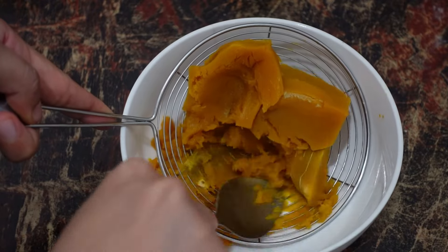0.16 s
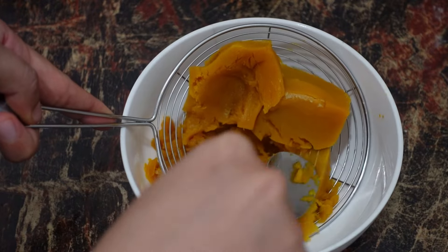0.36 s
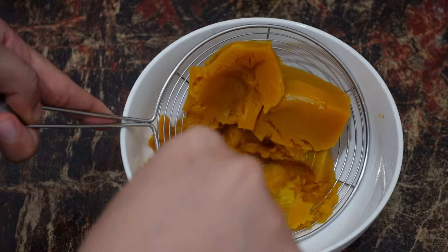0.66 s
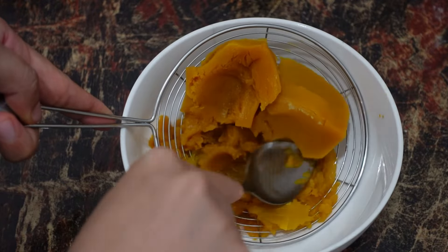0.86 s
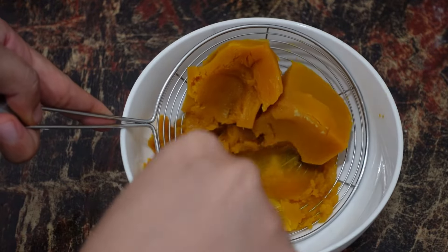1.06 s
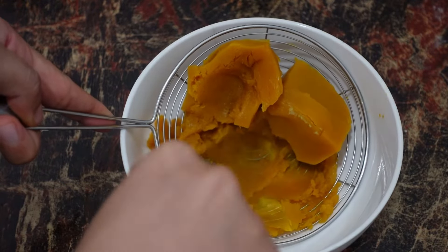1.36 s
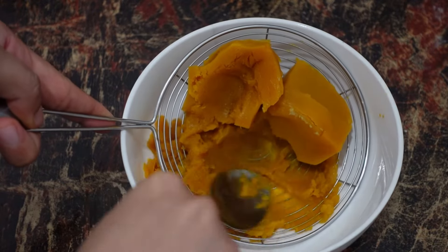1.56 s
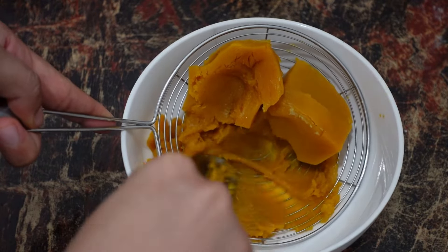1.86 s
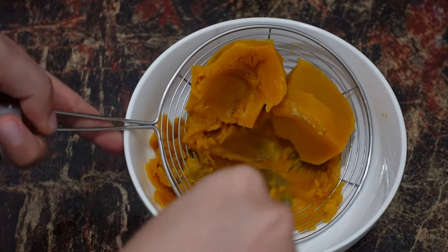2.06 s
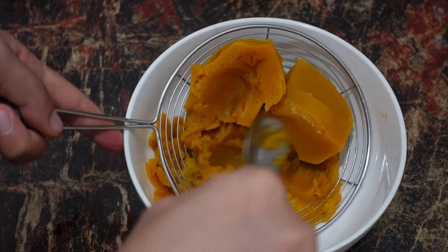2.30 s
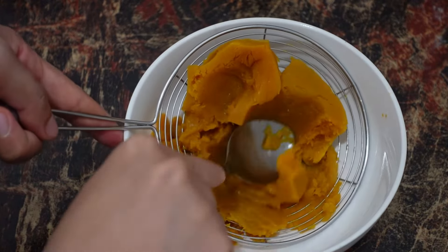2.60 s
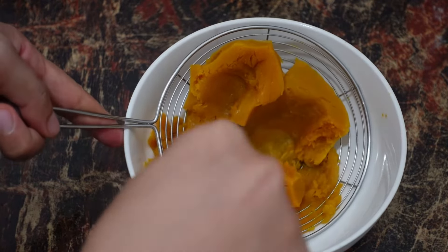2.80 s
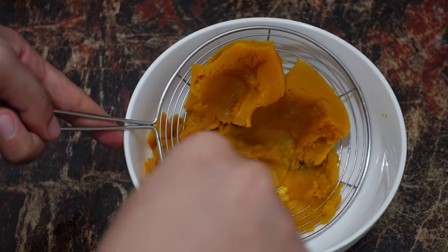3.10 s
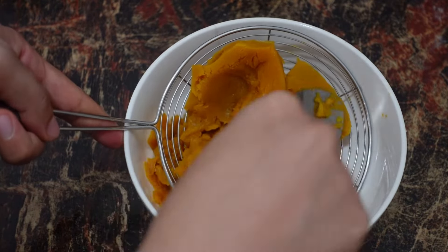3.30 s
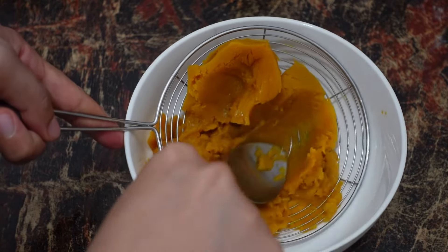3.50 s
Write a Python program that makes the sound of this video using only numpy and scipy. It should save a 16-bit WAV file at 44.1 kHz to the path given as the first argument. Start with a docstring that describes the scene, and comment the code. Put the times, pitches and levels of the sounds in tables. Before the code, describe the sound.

Cooked pumpkin squelches quietly under a steel spoon, with irregular wet pops, crackles and tiny squeaks for the first 1.5 seconds. Then the wire strainer clinks sharply against a china bowl, with a short scrape, and knocks again at about 1.8 and 2.1 seconds. Softer squishing continues, with light taps near 2.6 seconds and small taps and scrapes around 3.4 to 3.5. It is close, in a kitchen, over faint hiss.

```python
"""A live kitchen, where a steel spoon mashes cooked pumpkin through a wire strainer in a china bowl.
The wet pulp squelches, squeaks and crackles, and its air pockets pop. The spoon scrapes and skids over
the wires and knocks the strainer against the bowl three times, then taps more lightly; each contact
rings steel and china. All is heard close and in stereo, over a faint steady hiss."""
import sys
import numpy as np
from scipy import signal
from scipy.fft import rfft, irfft
from scipy.io import wavfile
from scipy.ndimage import uniform_filter1d

SR = 44100
rng = np.random.default_rng(int(sys.argv[2]) if len(sys.argv) > 2 else 0)


def to_wav(s):
    """Save 16-bit WAV."""
    ch = np.atleast_2d(s).T  # columns
    pcm = np.round(np.clip(ch, -1, 1) * 32767)  # PCM
    wavfile.write(sys.argv[1], SR, pcm.astype(np.int16))


N = 160965

# Contacts of spoon, strainer and bowl:
# (time [s], bowl level [dB], spoon level [dB], wire level [dB], brightness [dB/octave])
CONTACTS = [(1.5508, -33.5, -36, -34, 8.5), (1.5524, -27, -30.5, -27.5, 1.5), (1.556, -35, -35.5, -33, 5),
            (1.589, -40, -41, -44.5, 5), (1.623, -44.5, -45, -52.5, -1), (1.8349, -47, -37.5, -37.5, 5.5),
            (1.844, -38, -45, -35, 7), (1.8503, -37.5, -48.5, -34, 4), (1.8598, -36.5, -37.5, -31.5, 0),
            (2.124, -46.5, -60, -39, 2.5), (2.1298, -43.5, -44.5, -32.5, 3), (2.1332, -36, -45, -31, -0.5),
            (2.1421, -44.5, -55, -40.5, -4), (2.144, -45.5, -47.5, -38.5, -5.5),
            (2.149, -43.5, -52.5, -37.5, -2.5), (2.563, -49.5, -41.5, -43.5, 1),
            (2.6297, -55, -44.5, -46, 2), (3.3662, -55.5, -46, -50, 3), (3.3885, -47.5, -48, -47, 4),
            (3.42, -48.5, -57, -49.5, 10), (3.4989, -48.5, -42, -48, 3), (3.5187, -46, -42.5, -45, 1.5),
            (3.541, -53, -62, -45.5, 2)]
# Resonances of the steel spoon: (frequency [Hz], level [dB], T60 [s])
SPOON_MODES = [(1600, 1.5, 0.016), (2016, 5, 0.00784), (2725, -5, 0.0143), (3535, -5.5, 0.0376),
               (4600, -9.5, 0.021), (5409, -7, 0.0285), (5984, -11.5, 0.0103), (7290, -9.5, 0.0124),
               (9320, -8.5, 0.0158), (10936, -12.5, 0.0061)]


def from_db(db):
    """Decibels to gain."""
    return 10 ** (np.asarray(db) / 20)


def seconds(length):
    """A time axis."""
    return np.arange(int(length * SR)) / SR


def rms_one(x):
    """Scale to rms 1."""
    return x / np.sqrt(np.mean(x ** 2) + 1e-20)


def hit_one(x):
    """Scale a hit to rms 1 over its first 6 ms."""
    return x / np.sqrt(np.mean(x[..., :int(.006 * SR)] ** 2) + 1e-20)


def dying(t, t60):
    """Exponential decay, 60 dB down at t60."""
    return np.exp(-np.log(1000) * t / t60)


def stroke(t, length, attack_s, fall_db):
    """Quick rise, a sag over the length, then a release half as long."""
    attack = np.minimum(t / attack_s, 1)
    release = np.clip(1 - 2 * (t / length - 1), 0, 1)
    return attack * from_db(-fall_db * t / length) * release


def at_hz(points, hz):
    """Read a table on a log-frequency axis."""
    f, value = np.transpose(points)
    return np.interp(np.log(np.maximum(hz, 1)), np.log(f), value)


def panned(x, pan_db):
    """Place a sound left (+) or right (-)."""
    return x * from_db(np.array([[.5], [-.5]]) * pan_db)


def add(out, s, x):
    """Mix x in at time s."""
    i = int(s * SR)
    out[..., i:i + x.shape[-1]] += x[..., :max(N - i, 0)]


def softened(x, low_hz, high_hz):
    """Roll off bass and treble."""
    band = signal.butter(2, [low_hz, min(high_hz, .45 * SR)], "band", fs=SR, output="sos")
    return signal.sosfilt(band, x)


def coloured(x, spectrum, tilt_db=0):
    """Give a noise a spectrum, tilted per octave, at rms 1."""
    hz = np.fft.rfftfreq(x.shape[-1], 1 / SR)
    gain = from_db(at_hz(spectrum, hz) + tilt_db * np.log2(hz + 1))
    return rms_one(irfft(rfft(x) * gain, x.shape[-1]))


def echoed(x, response):
    """Pass a stereo sound through a response scaled to unit energy per side."""
    return signal.fftconvolve(x, response / np.sqrt((response ** 2).sum() / 2), axes=1)[:, :N]


def stereo_noise(n):
    """White noise, centred in the deep bass and wider above."""
    # Stereo image: (frequency [Hz], left-right correlation [0-1])
    likeness = [(40, 0.93), (130, 0.922), (260, 0.168), (550, 0.4), (1100, 0.521), (2500, 0.634),
                (5000, 0.733), (9000, 0.527), (14000, 0.076)]
    alike = at_hz(likeness, np.fft.rfftfreq(n, 1 / SR))
    mid, side = rfft(rng.standard_normal((2, n)))
    return rms_one(irfft(np.sqrt(1 + alike) * mid + np.sqrt(1 - alike) * side * [[1], [-1]], n))


def jitter(shape):
    """Fast random wavering: noise smoothed over 2 ms."""
    return rms_one(uniform_filter1d(rng.standard_normal(shape), size=90))


def grains(n, per_s, spread_db=2.5):
    """Random clicks of uneven size."""
    chance, size, sign = rng.random((3, n))
    gain = from_db(spread_db * np.minimum(-np.log(1 - size), 4))
    return (chance < per_s / SR) * gain * np.sign(sign - .5)


def cavity(x, hz, cycles):
    """A damped resonance that rings for a few cycles."""
    q = max(cycles * np.pi / np.log(1000), 1)
    return signal.lfilter(*signal.iirpeak(min(hz, .42 * SR), q, fs=SR), x)


def struck(modes, detune=0.0098, tilt_db=0):
    """One blow on a body: each mode rings with its own strength, detuned a little by pulp and grip."""
    hz, db, t60 = np.transpose(modes)[:, :, None]
    t = seconds(.5)
    spread_db = 2.5 * rng.standard_normal(hz.shape)
    gain = from_db(db + tilt_db * np.log2(hz) + spread_db) * rng.choice([-1, 1], hz.shape)
    hz = hz * (1 + detune * rng.standard_normal(hz.shape))
    rings = gain * np.cos(2 * np.pi * hz * t) * dying(t, t60)
    return hit_one(rings.sum(0))


def squelches():
    """Swarms of tiny resonant clicks make a wet fizz that starts quickly and fades."""
    # Short wet fizzes, soft pops and fading hissy tails: (time [s], length [s], level [dB], centre [Hz])
    fizzes = [(0.166, 0.1286, -46, 2050), (0.177, 0.13, -44.5, 4380), (0.347, 0.114, -53, 6900),
              (0.483, 0.0116, -36.5, 6720), (0.496, 0.063, -42, 6880), (0.565, 0.152, -45.5, 5200),
              (0.647, 0.0101, -37, 4450), (0.754, 0.1614, -50, 6510), (0.934, 0.0823, -50, 1635),
              (1.013, 0.039, -52, 2050), (1.103, 0.1153, -51.5, 2330), (1.104, .03, -45.5, 7470),
              (1.318, 0.0554, -46, 2280), (1.36, 0.08, -51.5, 9697), (1.418, 0.0434, -51, 2400),
              (1.785, .04, -47.5, 8940), (1.984, .025, -46.5, 1796), (2.325, 0.055, -54.5, 8324),
              (2.628, 0.01916, -49, 1744), (2.466, 0.083, -48.5, 9420), (2.639, 0.0687, -52, 4304),
              (2.664, 0.021, -39.5, 3920), (2.724, 0.114, -58, 4840), (2.969, 0.0116, -38, 5280),
              (2.981, 0.084, -56, 5520), (3.01, .011, -39.5, 5130), (3.091, 0.218, -55, 4730)]
    out = np.zeros(N)
    for s, length, db, hz in fizzes:
        t = seconds(1.5 * length)
        swarm = cavity(grains(len(t), per_s=3500), hz, cycles=4.02)
        swarm = softened(swarm, low_hz=1032, high_hz=2.34 * hz)
        add(out, s, from_db(db) * rms_one(swarm) * stroke(t, length, attack_s=0.0017, fall_db=15))
    return out


def pops():
    """A film of pulp tears; the pocket behind it rings briefly, with a weaker, lower resonance."""
    # Air pockets in the pulp: (time [s], level [dB], pitch [Hz], pan [dB])
    pockets = [(0.02, -44, 6252, 0), (0.3337, -37.5, 5400, 0.5), (0.3636, -49.5, 1365, -5.5),
               (0.406, -45.5, 5945, 2), (0.5027, -46, 1680, -3), (0.7472, -42.5, 7297, 4),
               (0.836, -39.5, 11460, 2.5), (0.917, -47, 4530, -2), (0.9215, -34.5, 3520, -1),
               (0.9418, -44, 3322, 1.5), (0.9463, -35, 3905, -3.5), (1.0155, -45.5, 2214, 0),
               (1.102, -38.5, 6780, 2), (1.2662, -40, 10400, -0.5), (1.272, -30, 4070, -1),
               (1.313, -40, 6340, -3), (1.753, -42, 5130, 0), (1.777, -40.5, 9000, 2),
               (1.932, -49, 8500, -1.5), (2.1912, -49, 7600, -4), (2.26, -44, 5300, -2),
               (2.4611, -38.5, 10660, 3.5), (2.6324, -38, 2890, -0.5), (2.659, -47, 7200, -3.5),
               (2.77, -49, 4170, -3.5), (3.216, -42.5, 7960, 2), (3.266, -46, 1823, 1.5),
               (3.471, -48.5, 6950, -3.5), (3.5988, -47.5, 9000, -0.5)]
    out, t = np.zeros((2, N)), seconds(.02)
    for s, db, hz, pan_db in pockets:
        tear = stereo_noise(len(t)) * np.exp(-t / 0.001154)
        ring = hit_one(cavity(tear, hz, cycles=6.06))
        body = hit_one(cavity(tear, 0.574 * hz, cycles=2.1))
        pop = softened(ring + from_db(-11.5) * body, low_hz=784, high_hz=2.127 * hz)
        add(out, s, panned(from_db(db) * hit_one(pop), pan_db))
    return out


def squeaks():
    """Wet pulp squeaks under the spoon in short, unsteady glides."""
    # Wet squeaks: (time [s], length [s], level [dB], start pitch [Hz], end pitch [Hz], roughness [0-1])
    glides = [(0.167, 0.016, -40.5, 2257, 2686, 0.78), (.547, 0.01072, -39, 2941, 3362, 0.58),
              (0.57, 0.046, -43, 2463, 2440, 0.21), (1.342, 0.0114, -45.5, 2663, 2848, 0.42),
              (2.024, .035, -48, 1447, 1529, 0.64), (3.13, 0.057, -57.5, 1282, 1319, 0.39),
              (3.207, 0.06, -56, 1271, 1295, 0.37)]
    out = np.zeros(N)
    for s, length, db, start_hz, end_hz, rough in glides:
        t = seconds(1.5 * length)
        wobble, flutter = jitter((2, len(t)))
        hz = np.interp(t, [0, length], [start_hz, end_hz]) * (1 + 0.0647 * rough * wobble)
        tone = rms_one(np.sin(2 * np.pi * np.cumsum(hz) / SR) * (1 + rough * flutter))
        add(out, s, from_db(db) * tone * stroke(t, length, attack_s=0.0024, fall_db=11))
    return out


def steel_knocks():
    """Each contact rings the spoon and makes the wires clatter."""
    # Resonances of the strainer's wires: (frequency [Hz], level [dB], T60 [s])
    wire_modes = [(2780, 6.5, 0.035), (3706, 3, 0.0425), (3970, 4, 0.039), (4225, -2, 0.043),
                  (4959, -1.5, 0.0466), (5284, 9, 0.0434), (7523, -17, 0.038), (9400, -8, 0.035)]
    # Spectrum of the rattling mesh: (frequency [Hz], level [dB])
    clatter_colour = [(330, -34), (550, -24.5), (900, -10.5), (2000, -0.5), (3800, 7), (6000, 6),
                      (9000, 2.5), (11500, -6), (16000, -11.5)]
    out, t = np.zeros((2, N)), seconds(.5)
    for s, _, spoon_db, wire_db, tilt_db in CONTACTS:
        noise = coloured(stereo_noise(len(t)), clatter_colour, tilt_db)
        clatter = hit_one(noise * dying(t, t60=0.0347))
        ring = struck(wire_modes, detune=0.0237, tilt_db=tilt_db)  # every contact meets other wires
        wires = clatter + from_db(-7) * ring
        spoon = struck(SPOON_MODES, tilt_db=tilt_db)
        add(out, s, from_db(spoon_db) * spoon + from_db(wire_db) * wires)
    return out


def bowl_knocks():
    """Each contact rings the china bowl, which the pulp damps quickly."""
    # Resonances of the bowl: (frequency [Hz], level [dB], T60 [s])
    bowl_modes = [(503.9, -31, 0.217), (835.3, -10.5, 0.0886), (1023, -4.5, 0.0238), (1204.3, 3.5, 0.0207),
                  (1366, -4, 0.022), (1481, 4.5, 0.0231), (1621, -0.5, 0.0186), (1669, -13.5, 0.075),
                  (1887, -13.5, 0.064)]
    out = np.zeros(N)
    for s, bowl_db, *_ in CONTACTS:
        add(out, s, from_db(bowl_db + 1) * struck(bowl_modes))
    return softened(out, low_hz=396, high_hz=5000)


def scrapes():
    """Dense little slips ring the spoon."""
    # The spoon's edge dragged over the wires: (time [s], length [s], level [dB])
    drags = [(1.585, 0.0382, -36.5), (3.401, .07, -45.5), (3.499, 0.071, -49.5)]
    out = np.zeros(N)
    for s, length, db in drags:
        t = seconds(1.5 * length)
        slips = grains(len(t), per_s=350)
        rasp = signal.fftconvolve(slips, struck(SPOON_MODES))[:len(t)]
        add(out, s, from_db(db) * rms_one(rasp) * stroke(t, length, attack_s=0.0042, fall_db=20))
    return out


def skids():
    """Sticking and slipping drives one resonance per skid, with a slightly unsteady pitch."""
    # Steel and china sing after the hardest knock: (time [s], length [s], level [dB], pitch [Hz])
    skid_tones = [(1.5547, 0.0079, -30, 3551), (1.565, 0.0586, -53, 510.9), (1.569, 0.0144, -37, 5453),
                  (1.594, 0.024, -44.5, 5500), (1.686, 0.0077, -43.5, 5454)]
    out = np.zeros(N)
    for s, length, db, pitch_hz in skid_tones:
        t = seconds(1.5 * length)
        hz = pitch_hz * (1 + 0.0259 * jitter(len(t)))
        tone = rms_one(np.sin(2 * np.pi * np.cumsum(hz) / SR))
        add(out, s, from_db(db) * tone * stroke(t, length, attack_s=0.0017, fall_db=8))
    return out


def crackle():
    """The pulp settles all the time in faint, tiny clicks."""
    # Spectrum of the settling pulp: (frequency [Hz], level [dB])
    crackle_colour = [(500, -13.5), (900, -10.5), (1600, 1.5), (4000, -2.5), (7000, -1.5), (11000, -6.5),
                      (16000, -14)]
    return from_db(-60) * coloured(grains(N, per_s=900, spread_db=2), crackle_colour)


def bowl_echoes(x):
    """Quick reflections from the bowl's wall, the hand and the table."""
    t = seconds(.03)
    reflections = stereo_noise(len(t)) * dying(t, t60=0.0238) * (t > .0004)
    return echoed(x, reflections)


def kitchen_reverb(x):
    """The room's diffuse tail builds quickly and dies band by band."""
    # Decay of the room: (frequency [Hz], T60 [s])
    room_t60 = [(300, 0.87), (1000, 0.588), (2800, 0.714), (7000, 0.351), (15000, 0.582)]
    # Tone of the room: (frequency [Hz], level [dB])
    room_colour = [(200, 3), (550, 4.5), (1100, 1.5), (1700, 1), (2300, -0.5), (5000, 1), (10000, 1),
                   (16000, 2.5)]
    t = seconds(.8)
    spectrum = rfft(coloured(stereo_noise(len(t)), room_colour))
    hz, centres = np.fft.rfftfreq(len(t), 1 / SR), np.geomspace(250, 16000, 7)
    tail = np.zeros((2, len(t)))
    for centre, share in zip(centres, np.eye(len(centres))):
        octave = irfft(spectrum * at_hz(np.c_[centres, share], hz), len(t))
        tail += octave * dying(t, at_hz(room_t60, centre))
    build_up = 1 - np.exp(-t / 0.0023)
    return echoed(x, tail * build_up)


def hiss():
    """A faint, steady bed of broad noise."""
    # Spectrum of the hiss: (frequency [Hz], level [dB])
    hiss_colour = [(25, -34), (50, -19.5), (85, 6), (115, 3.5), (180, 1.5), (280, -3.5), (480, 1.5),
                   (800, 9), (1200, 3.5), (1700, 7), (3000, 8), (6000, 8), (10000, 3.5), (15500, -19)]
    return from_db(-54.5) * coloured(stereo_noise(N), hiss_colour)


def scene():
    """Steel and china just right of centre, pulp just left, the kitchen around them and the hiss."""
    steel = softened(steel_knocks() + scrapes() + skids(), low_hz=381, high_hz=17280)
    steel = panned(steel, pan_db=-1)
    popping = pops()
    china = panned(bowl_knocks(), pan_db=-1)
    pulp = panned(crackle() + squelches(), pan_db=1)
    squeaking = panned(squeaks(), pan_db=1)
    direct = steel + china + popping + pulp + squeaking
    # The bowl rings straight up at the microphone, so it gets the least room.
    room_send = (from_db(-1) * steel + from_db(-6) * china + from_db(-3) * popping
                 + from_db(-1.5) * pulp + from_db(0.5) * squeaking)
    return direct + from_db(-6.5) * bowl_echoes(direct) + kitchen_reverb(room_send) + hiss()


def record(dry):
    """A steep low-pass cuts the top above 15.8 kHz."""
    return signal.sosfilt(signal.ellip(10, .1, 80, 15800, fs=SR, output="sos"), dry)


dry = scene()
out = record(dry)
to_wav(out)
```